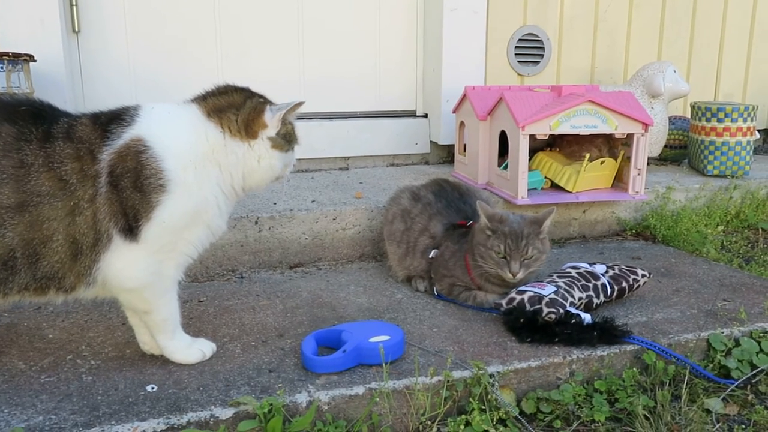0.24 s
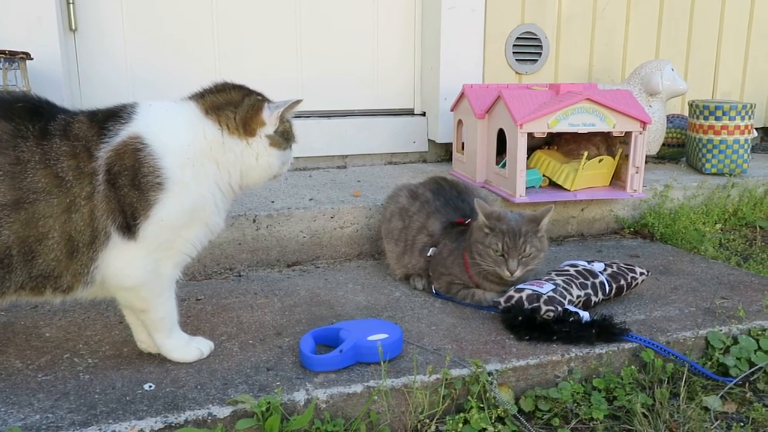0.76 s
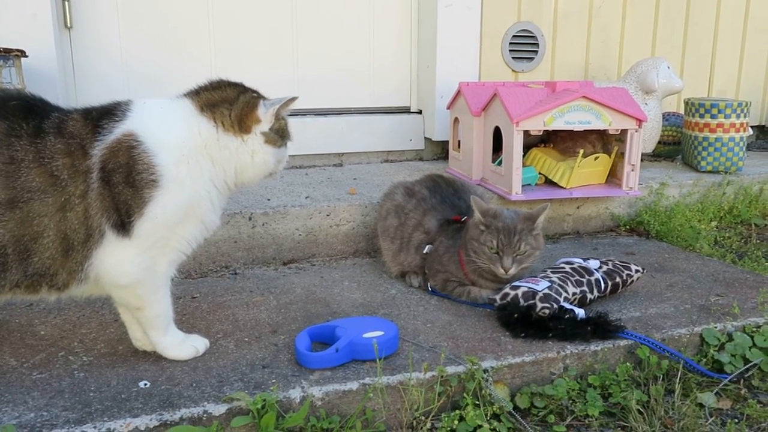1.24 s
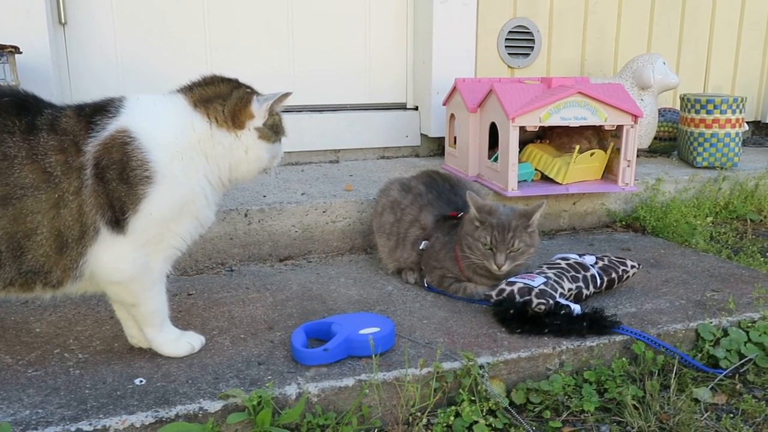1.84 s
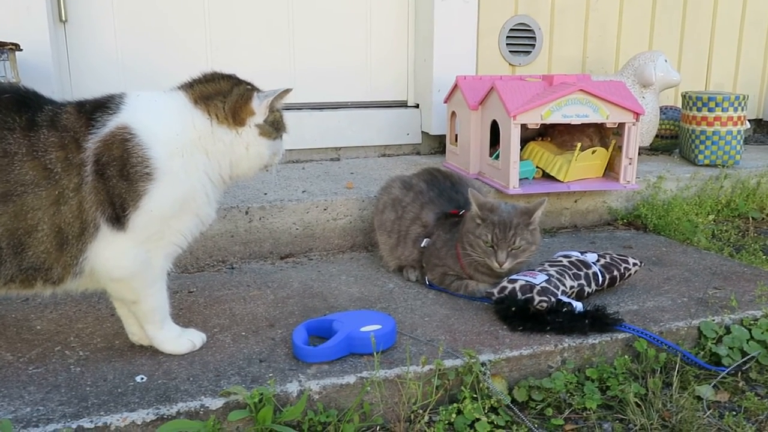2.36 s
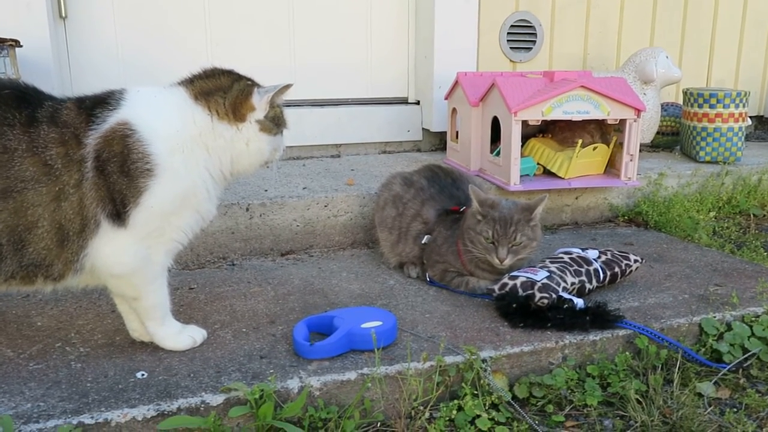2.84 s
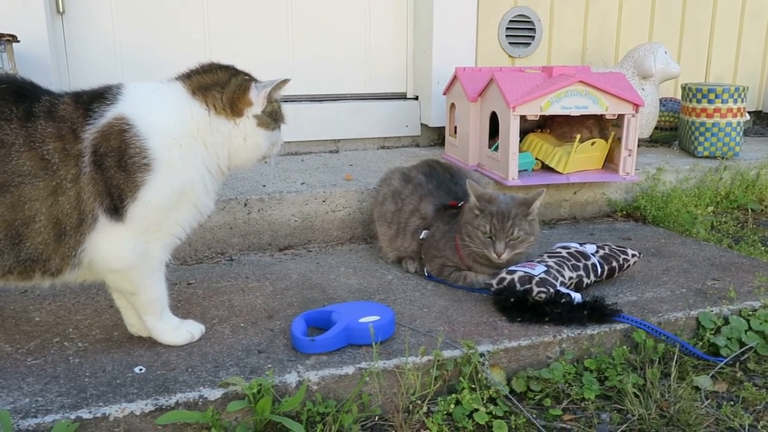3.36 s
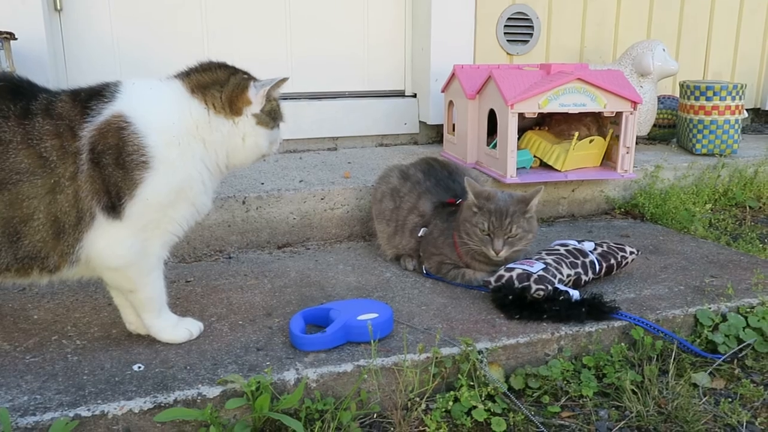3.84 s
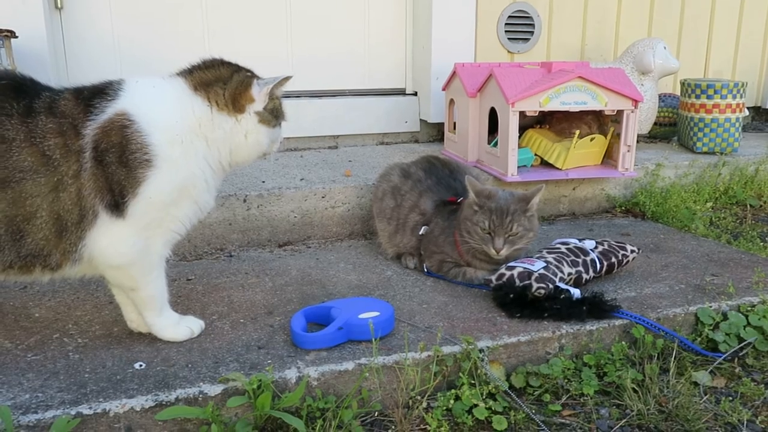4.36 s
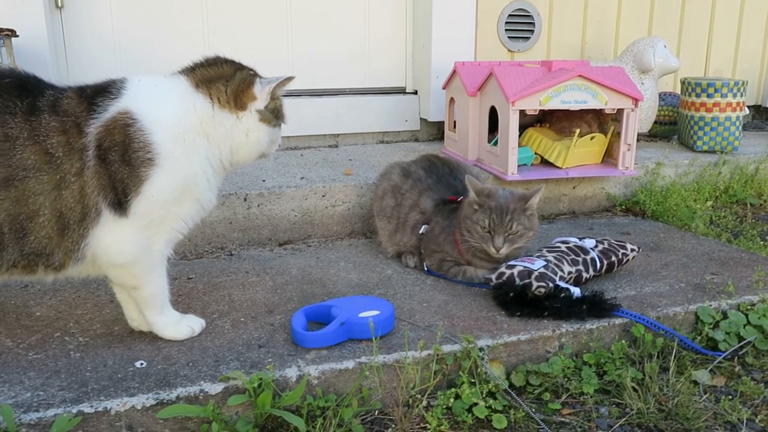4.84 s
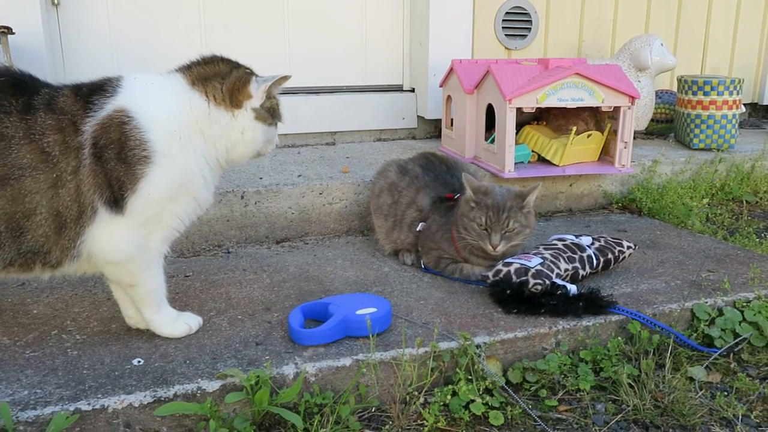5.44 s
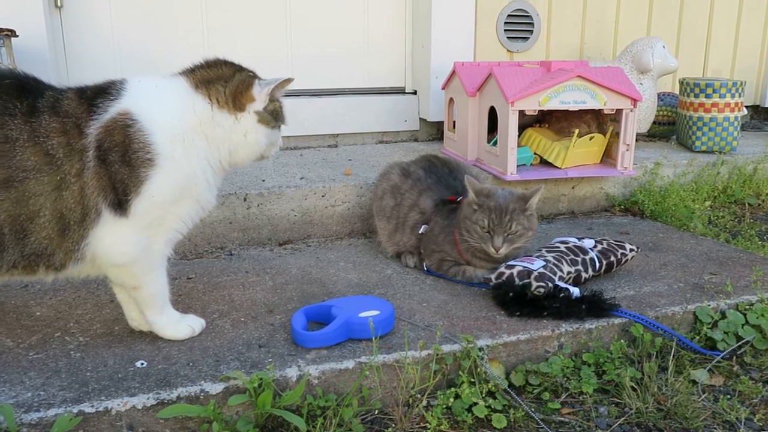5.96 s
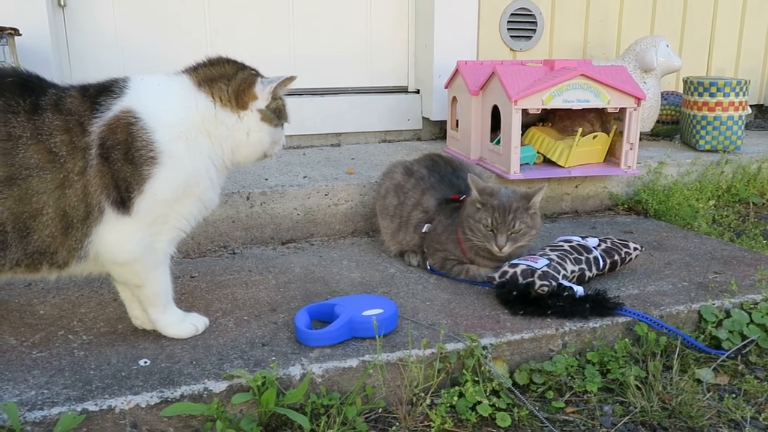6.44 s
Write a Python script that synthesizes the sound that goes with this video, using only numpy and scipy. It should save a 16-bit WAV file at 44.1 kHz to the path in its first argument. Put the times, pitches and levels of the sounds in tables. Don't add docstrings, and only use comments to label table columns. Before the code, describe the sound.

Outdoors beside a house wall, a cat a metre or two away moans, pauses, growls low and slides up into a long arching wail. After another gap it barks out a harsh cry that sinks into a moan, and a last sharp cry starts at the very end. Light wind thumps the hand-held camera microphone over far traffic, hiss, a faint bird and brief grass rustles.

```python
import sys
import numpy as np
from scipy import signal
from scipy.fft import rfft, irfft, next_fast_len
from scipy.io import wavfile
from scipy.ndimage import uniform_filter1d, map_coordinates

SR = 44100
rng = np.random.default_rng(int(sys.argv[2]) if len(sys.argv) > 2 else 0)


def wrap_up_sound(samples):
    columns = np.atleast_2d(samples).T
    tamed = np.clip(columns, -1, 1)
    steps = np.round(tamed * 32767).astype(np.int16)
    wavfile.write(sys.argv[1], SR, steps)


def makeup_ratio(level_db):
    decades = np.asarray(level_db, float) / 20
    return 10 ** decades


N = 295911

# pressure dip in seconds, peak in dB, frequency in Hz, left minus right in dB.
WIND_POPS = [(0.674, -36, 80, -4), (0.989, -35, 50.3, 4), (1.165, -48, 45, 1), (1.253, -51, 65, 5),
             (1.819, -39, 60, 4), (1.843, -45, 60, -5), (2.208, -43, 45, -1), (2.254, -46, 85, 4),
             (2.267, -53, 70, 4), (2.362, -33, 79, 5), (2.733, -45, 50, 4), (3.01, -38.5, 70.4, -3),
             (3.39, -48, 54.3, 0), (3.486, -38.5, 55, -4), (3.745, -48, 70, 1), (3.911, -38.5, 58, -7),
             (3.939, -47, 70, -4), (3.972, -36.5, 76.4, 8), (4.172, -37.5, 75, -5), (4.202, -38.5, 98, -7),
             (4.303, -40.5, 67, -1), (4.373, -43, 65.7, -3), (4.78, -45, 84, -13), (4.948, -44, 55.5, 2)]


def unit(x):
    return x / np.sqrt(np.mean(x ** 2) + 1e-20)


def along(points, hz):
    f, db = np.transpose(points)
    return makeup_ratio(np.interp(np.log(hz + 1), np.log(f + 1), db, left=-120, right=-120))


def filtered(x, spectrum):
    size = next_fast_len(N + 8192)
    gain = along(spectrum, np.fft.rfftfreq(size, 1 / SR))
    return irfft(rfft(x, size) * gain, size)[:N]


def noise(spectrum, lumps=1):
    return unit(filtered(lumps * rng.standard_normal(N), spectrum))


def curves(rows):
    s, *columns = np.transpose(rows)
    return [np.interp(np.arange(N) / SR, s, column) for column in columns]


def gate(rows, fade_s):
    t = np.arange(N) / SR
    since_start, until_end = t - rows[0][0], rows[-1][0] - t
    return np.clip((np.minimum(since_start, until_end) + fade_s) / fade_s, 0, 1)


def wobble(rate_hz):
    knots = rng.standard_normal(int(N * rate_hz / SR) + 4)
    return map_coordinates(knots, [np.arange(N) * rate_hz / SR])


def bumps(rows):
    t = np.arange(N) / SR
    return sum(height * np.exp(-((t - s) / half_s) ** 2) for s, height, half_s in rows)


def patchy(x, depth_db):
    z = signal.stft(x, nperseg=512)[2]
    field = uniform_filter1d(rng.standard_normal(z.shape), size=8, axis=0)
    field = unit(uniform_filter1d(field, size=24, axis=1))
    return unit(signal.istft(z * makeup_ratio(depth_db * field), nperseg=512)[1][:N])


def bark_edge(pitch_hz, phase, opening):
    # frequency in Hz, level against the resonance in dB.
    mouth = [(2000, -6), (2600, -6), (3400, -7), (4200, 0), (4700, -12), (5300, -11), (6400, -16),
             (8000, -40)]
    # frequency in Hz, density in dB per Hz.
    rasp_colour = [(600, -30), (1000, -4), (1300, 0), (2100, -3), (2800, -18), (4200, -15), (6000, -32)]
    level_db, wide, shut_db = -64, .8, -150
    high = 0
    for k in range(4, 11):
        gain = along(mouth, k * pitch_hz) * makeup_ratio(3 * wobble(45))
        high = high + gain * np.sin(k * phase + .7 * wobble(70))
    puffs = 1 + np.sin(phase)
    rasp = makeup_ratio(5) * noise(rasp_colour, puffs)
    return makeup_ratio(level_db + shut_db * np.clip(wide - opening, 0, 1)) * (high + rasp)


def yowl(rows, tilt_db, barked):
    # time in seconds, depth in dB, half length in seconds.
    catches = [
        (.29, 10, 0.018),
        (1.72, 12, .012),
        (1.662, 5, .008),
        (2.61, 9, .03),
        (.156, 4, .02),
        (2.577, 15, 0.019),
        (2.86, 3.5, 0.047),
        (3.848, 17, .008),
        (4.211, 13, 0.0099),
    ]
    closed_hz, open_hz, sharpness = 199, 2123, 2.59
    jitter, shimmer_db = 0.00432, 1.0
    pitch_hz, db, opening = curves(rows)
    phase = 2 * np.pi * np.cumsum(pitch_hz * (1 + jitter * wobble(60))) / SR
    k = np.arange(1, 4)[:, None]
    ratio = k * pitch_hz / (closed_hz * (open_hz / closed_hz) ** opening)
    shares = makeup_ratio(tilt_db * k) / ((1 - ratio ** 2) ** 2 + (ratio / sharpness) ** 2)
    shares = shares / np.linalg.norm(shares, axis=0)
    shares = shares * makeup_ratio(-bumps(catches) * (k == 1))
    partials = 0
    for j, share in enumerate(shares, start=1):
        partials = partials + share * makeup_ratio(shimmer_db * wobble(35)) * np.cos(j * phase)
    voice = makeup_ratio(db) * partials
    if barked:
        voice = voice + bark_edge(pitch_hz, phase, opening)
    return np.sqrt(2) * gate(rows, fade_s=0.0022) * voice


def cat():
    # time in seconds, pitch in Hz, level in dB, mouth opening 0-1.
    first_tail = [(0, 542.3, -47.5, 0.89), (.156, 537.6, -49.5, 0.91), (.25, 526.4, -47, 0.82),
                  (.326, 512, -47.5, .8), (.454, 519.4, -49, 0.78), (.548, 522.4, -51, 0.81),
                  (.572, 605, -46, 0.36), (.588, 673, -57, .5), (.612, 605, -76, .5)]
    growl = [(1.634, 140.5, -55, 0.046), (1.649, 145.3, -43, .06), (1.685, 176, -36, .12),
             (1.705, 214, -34, .19), (1.748, 417, -36.5, 0.34), (1.789, 532, -49, .45),
             (1.827, 612, -48.5, 0.58), (1.866, 646, -48, 0.56), (1.903, 677, -62, 0.74)]
    arch = [(1.907, 690, -54.5, .7), (1.964, 707, -45, 0.63), (2.079, 730, -45.5, 0.65),
            (2.22, 730, -51.5, .69), (2.38, 731, -45.5, 0.67), (2.539, 697, -47, 0.65),
            (2.705, 640, -46.5, .6), (2.912, 573, -49, 0.58), (2.98, 505, -66, 0.63)]
    bark = [(3.776, 645, -46, .88), (3.783, 632, -35, .9), (3.813, 661, -32, 1), (3.822, 695, -41.5, 0.78),
            (3.848, 692, -37, 0.77), (3.866, 742, -37.5, 0.74), (3.925, 739, -34, 0.73),
            (3.965, 744, -38, 0.61), (4.041, 729, -45.5, .72)]
    moan = [(4.045, 689, -53, 0.64), (4.06, 653.6, -42, 0.63), (4.089, 709, -55, .62),
            (4.14, 693.5, -56, .6), (4.19, 641, -41.5, 0.44), (4.25, 584, -44, .52),
            (4.34, 568.7, -44.5, .55), (4.45, 582.6, -44, .56), (4.602, 553.4, -48, .59)]
    hook = [(4.603, 548, -50.5, 0.57), (4.635, 600, -51, .47), (4.655, 661.5, -49, .5),
            (4.685, 690, -81, .5)]
    last_bark = [(6.597, 616, -45, 0.75), (6.604, 632, -39.5, 0.86), (6.622, 602, -41.5, 0.81),
                 (6.632, 627, -35.5, 0.88), (6.641, 675, -36.5, 1), (6.655, 671, -37, 0.97),
                 (6.664, 715, -46, 0.88), (6.673, 738, -39, .73), (6.71, 736, -37.5, .72)]
    # delay in seconds, left in dB, right in dB.
    wall = [(.0031, -27, -25.5), (.0074, -17.5, -19), (.013, -27, -26), (.024, -21.5, -27),
            (.041, -24, -22)]
    # frequency in Hz, gain in dB.
    shadow = [(300, -34), (800, -30), (1100, -14.5), (1500, -16), (2000, -26), (5000, -15), (8000, -24)]
    firm_db, slack_db = -3, -8.5
    voice = yowl(first_tail, slack_db, barked=False)
    for rows in (growl, arch, moan, hook):
        voice = voice + yowl(rows, firm_db, barked=False)
    for rows in (bark, last_bark):
        voice = voice + yowl(rows, firm_db, barked=True)
    echo = 0
    for delay_s, left_db, right_db in wall:
        late = np.pad(voice, (round(delay_s * SR), 0))[:N]
        echo = echo + makeup_ratio([[left_db], [right_db]]) * late
    return voice + filtered(voice, shadow) * [[1], [-1]] + echo


def traffic():
    # frequency in Hz, density in dB per Hz.
    rumble_colour = [(12, -23), (22, -16.5), (36, -6.5), (50, -1.5), (62, -6), (80, -14), (130, -24),
                     (200, -43)]
    # frequency in Hz, density in dB per Hz.
    drone_colour = [(200, -14), (270, -8.5), (318, 2.5), (370, -8.5), (450, -9.5), (520, -39)]
    # time in seconds, peak in dB, half length in seconds.
    swells = [(0, -59.5, 0.14), (0.944, -60.5, 0.15), (1.734, -55, .15), (2.032, -53.5, .18),
              (2.85, -58, .12), (3.12, -55, .1), (3.605, -58, 0.18), (3.918, -56.5, 0.18),
              (4.666, -58, 0.14), (5.627, -63.5, 0.2), (6.004, -65, 0.14), (6.7, -65, 0.13)]
    rumble = makeup_ratio(-53 + 0.65 * wobble(3.5)) * noise(rumble_colour)
    swell = bumps([(s, makeup_ratio(db), half_s) for s, db, half_s in swells])
    return rumble + swell * makeup_ratio(0.66 * wobble(15)) * noise(drone_colour)


def ambience():
    # frequency in Hz, density in dB per Hz.
    wash_colour = [(71, -33), (120, -3.5), (241, -7.5), (320, -7), (440, -10), (665, -14.5), (950, -15),
                   (1470, -16.5), (2000, -21), (3500, -26), (6000, -33), (8330, -38.5), (11200, -43),
                   (14000, -47.5)]
    return makeup_ratio(-56.5) * patchy(noise(wash_colour), depth_db=1.5)


def hiss():
    # frequency in Hz, density in dB per Hz.
    hiss_colour = [(71, -14), (120, -10.5), (266, -3), (388, -3.5), (828, -10.5), (914, -4), (990, -13.5),
                   (1180, -5.5), (1310, -10.5), (4680, -19.5), (14000, -35)]
    side = makeup_ratio(-57) * noise(hiss_colour)
    return np.array([side, -side])


def circuit():
    # frequency in Hz, level in dB rms.
    lines = [(4120, -92), (8240, -89.5)]
    t = np.arange(N) / SR
    return sum(makeup_ratio(db + 2.5 + 1.4 * wobble(17)) * np.sin(2 * np.pi * hz * t) for hz, db in lines)


def wind():
    # frequency in Hz, density in dB per Hz.
    thump_colour = [(8.8, -52), (15, -11.5), (38, 2.5), (55, 3.5), (140, -16), (162, -32), (220, -20),
                    (290, -31.5), (480, -120)]
    # frequency in Hz, density in dB per Hz.
    eddy_colour = [(15, -24), (35, -7), (70, 2), (120, 4), (170, -5), (260, -38)]
    calm_db, gust_db, gust_half_s = -61, -14, .06
    gust = makeup_ratio(calm_db) + bumps([(s, makeup_ratio(db + gust_db), gust_half_s) for s, db, *_ in WIND_POPS])
    lumps = makeup_ratio(3.5 * wobble(24))
    thump = gust * noise(thump_colour, lumps)
    eddy_gain = makeup_ratio(-66.5) * (gust / makeup_ratio(-51.5)) ** 1.36
    eddy = eddy_gain * noise(eddy_colour, lumps)
    return np.array([thump + eddy, thump - eddy])


def pops():
    out = np.zeros((2, N + SR))
    t = np.arange(SR // 10) / SR
    for s, db, hz, pan_db in WIND_POPS:
        swell = np.sin(np.pi * np.clip(t * hz / 1.6, 0, 1)) ** 2
        push = swell * -np.cos(2 * np.pi * (hz * t - .8))
        start = round((s - .8 / hz) * SR)
        sides_db = np.array([[pan_db], [-pan_db]]) / 2
        out[:, start:start + len(t)] += makeup_ratio(db + 1.5 + sides_db) * push
    return out[:, :N]


def bird():
    # time in seconds, pitch in Hz, level in dB.
    whistles = [
        [(2.125, 3700, -85), (2.15, 3720, -74), (2.185, 3780, -74), (2.2, 4000, -71), (2.22, 4050, -85)],
        [(3.34, 4950, -84), (3.365, 4870, -72), (3.44, 4480, -71), (3.49, 4150, -65), (3.53, 4050, -72),
         (3.56, 4000, -86)],
    ]
    out = np.zeros(N)
    for rows in whistles:
        pitch_hz, db = curves(rows)
        phase = 2 * np.pi * np.cumsum(pitch_hz * (1 + .016 * wobble(150))) / SR
        out += gate(rows, fade_s=.01) * makeup_ratio(db + 3 + 2.5 * wobble(60)) * np.sin(phase)
    return np.array([out, np.roll(out, shift=2)])


def grass():
    # time in seconds, peak in dB.
    rustles = [
        (4.077, -49),
        (4.1494, -49),
        (4.225, -49),
        (4.2857, -50.5),
        (4.3854, -50.5),
    ]
    # frequency in Hz, density in dB per Hz.
    blade_colour = [(1100, -14), (1900, 0), (2700, -6), (3800, -2), (4700, -9), (6000, -25)]
    swell = bumps([(s + .01, makeup_ratio(db - 15), .017) for s, db in rustles])
    apart = np.array([noise(blade_colour), noise(blade_colour)])
    return swell * (noise(blade_colour) + 1.05 * apart)


def scene():
    steady = traffic() + ambience() + hiss() + circuit()
    return cat() + steady + wind() + pops() + bird() + grass()


def top_cut(x):
    return signal.sosfilt(signal.butter(12, 14130, fs=SR, output="sos"), x)


def record(dry):
    return top_cut(dry)


dry = scene()
out = record(dry)
wrap_up_sound(out)
```